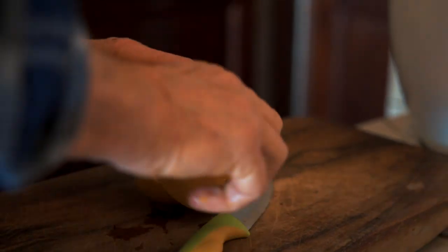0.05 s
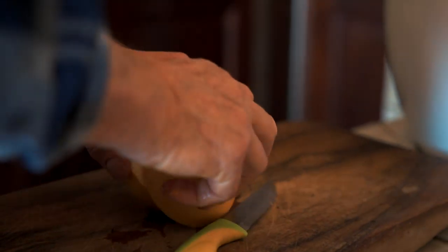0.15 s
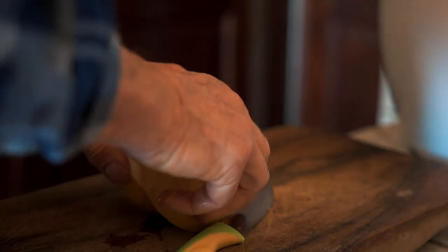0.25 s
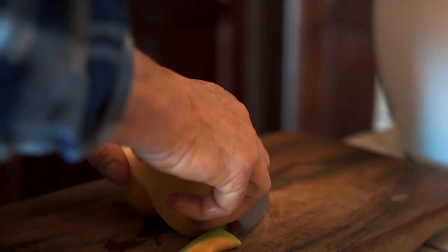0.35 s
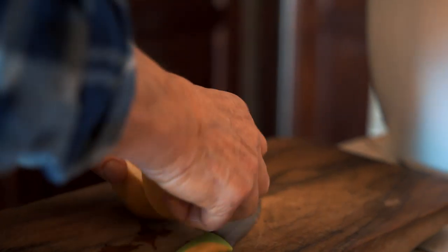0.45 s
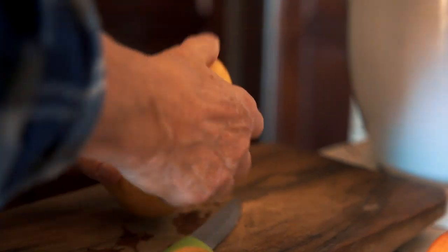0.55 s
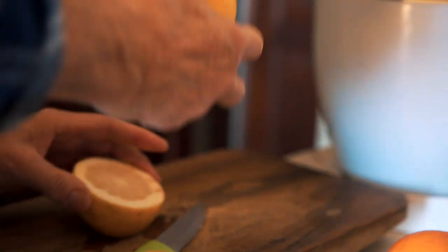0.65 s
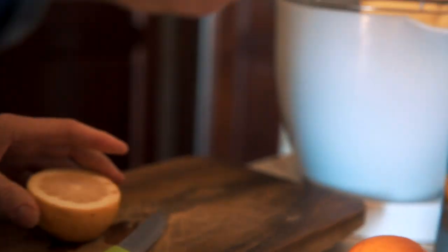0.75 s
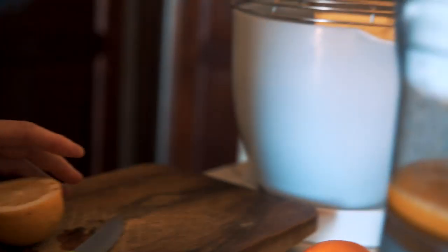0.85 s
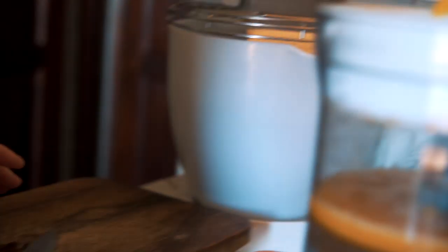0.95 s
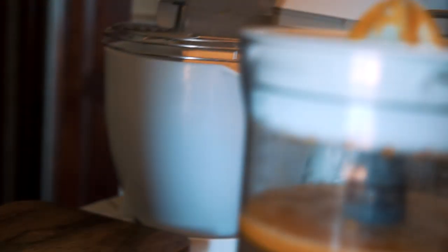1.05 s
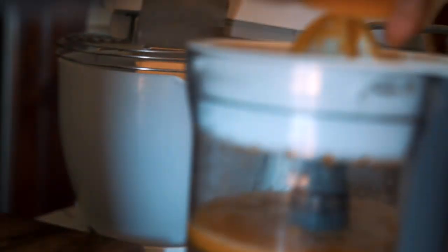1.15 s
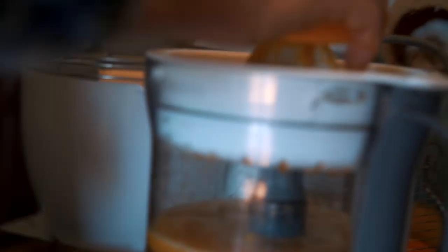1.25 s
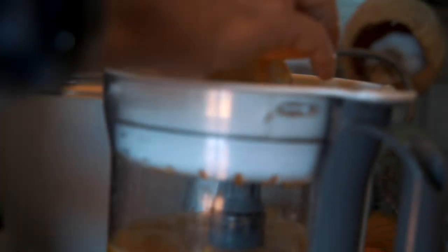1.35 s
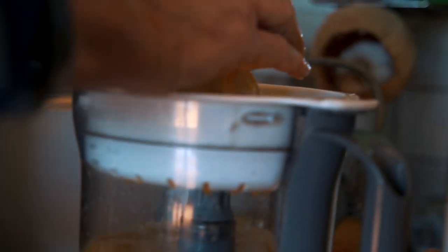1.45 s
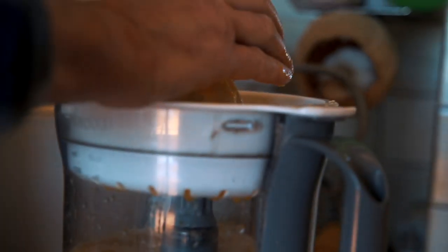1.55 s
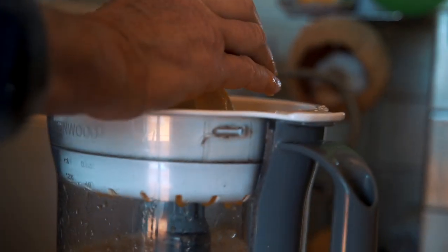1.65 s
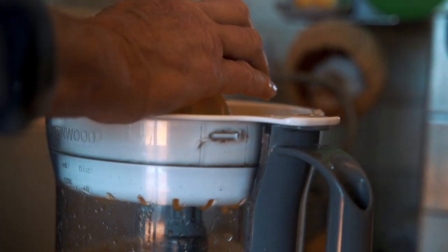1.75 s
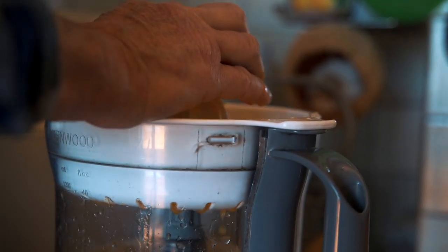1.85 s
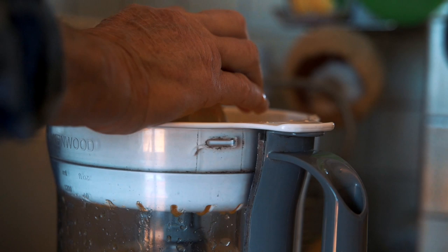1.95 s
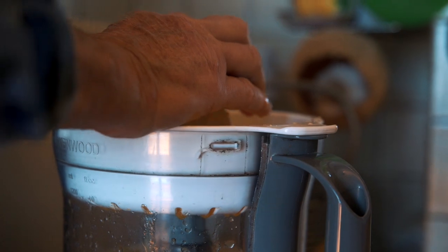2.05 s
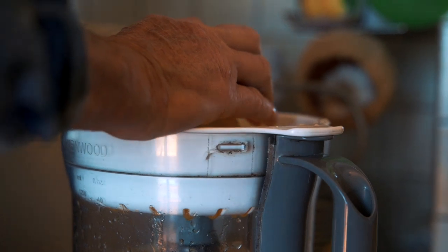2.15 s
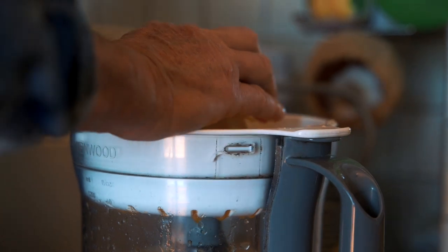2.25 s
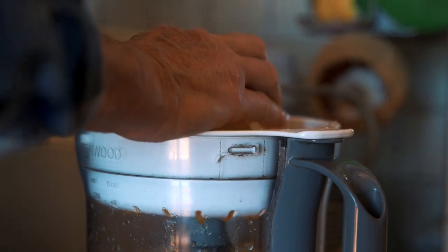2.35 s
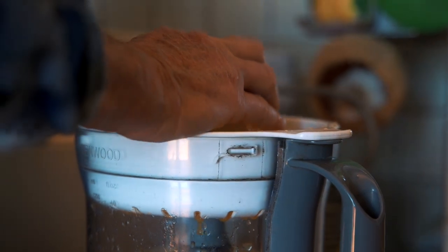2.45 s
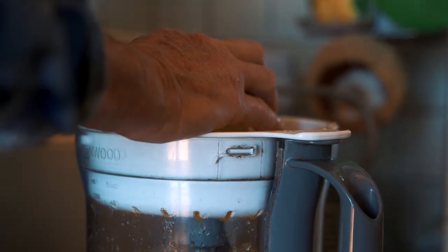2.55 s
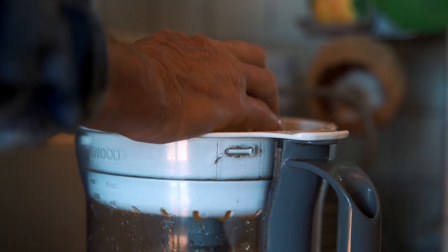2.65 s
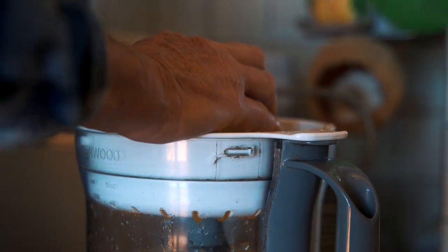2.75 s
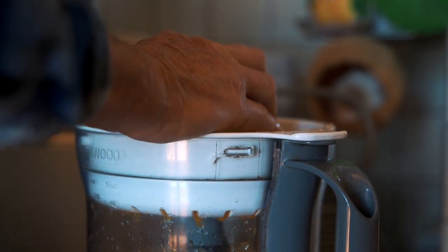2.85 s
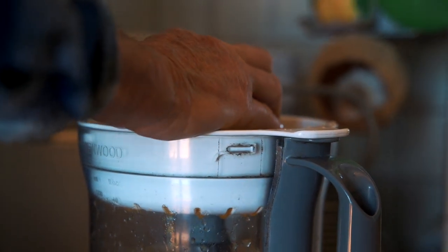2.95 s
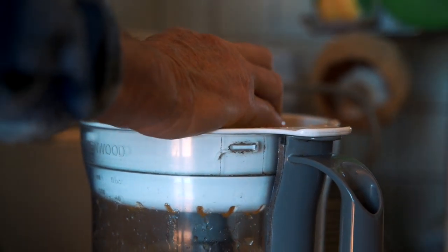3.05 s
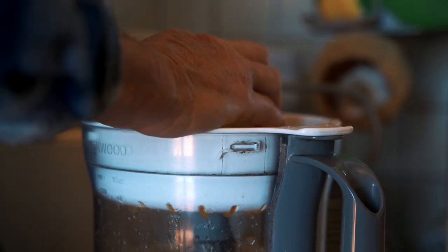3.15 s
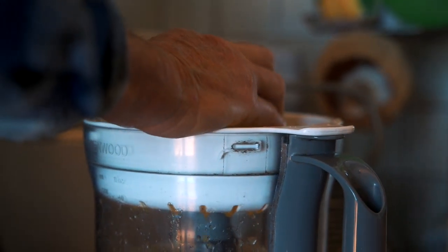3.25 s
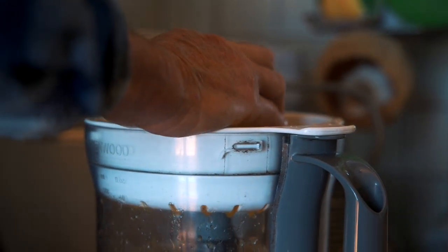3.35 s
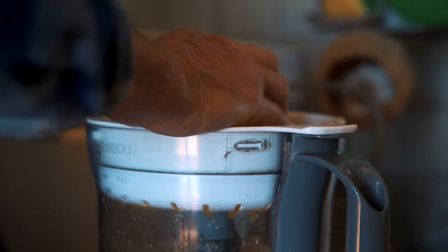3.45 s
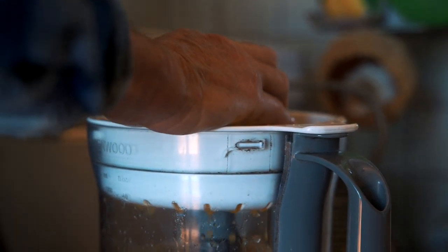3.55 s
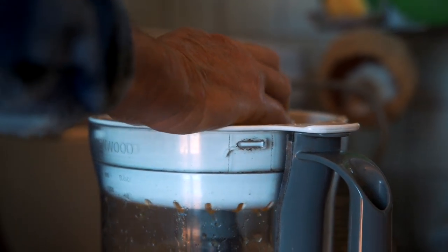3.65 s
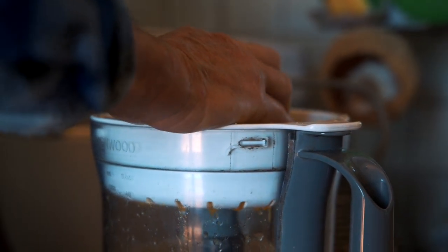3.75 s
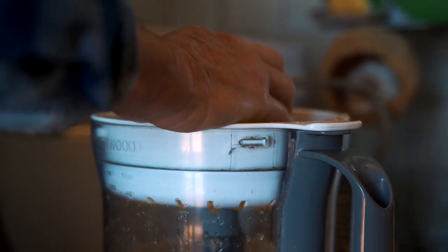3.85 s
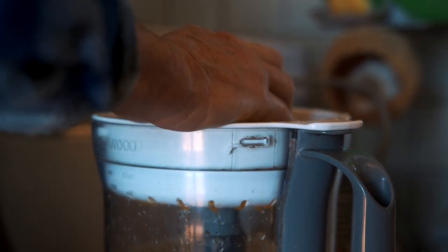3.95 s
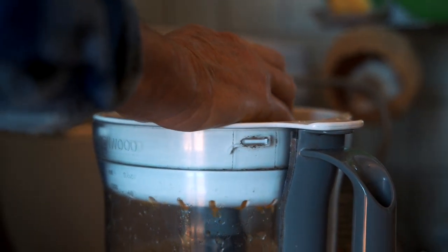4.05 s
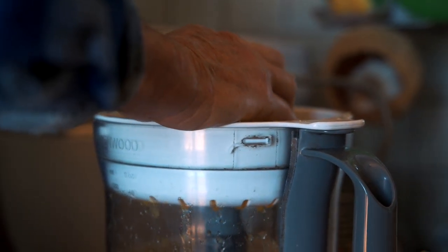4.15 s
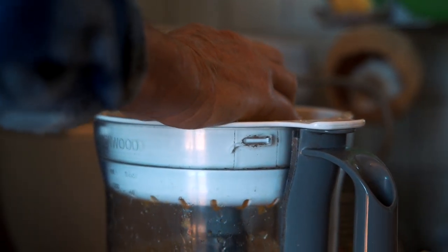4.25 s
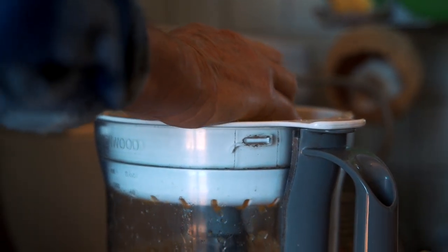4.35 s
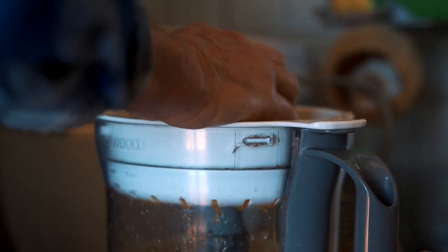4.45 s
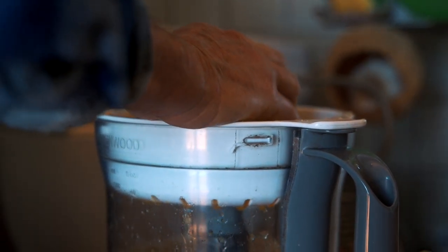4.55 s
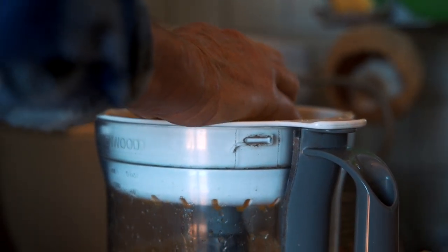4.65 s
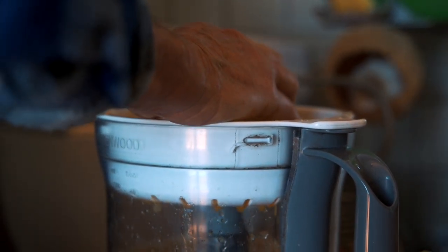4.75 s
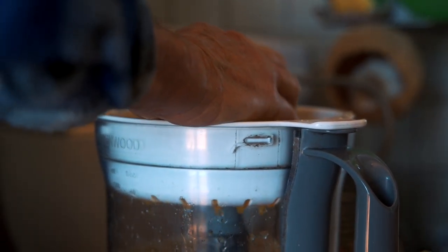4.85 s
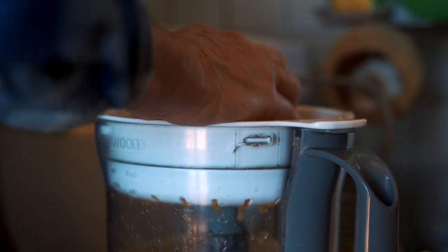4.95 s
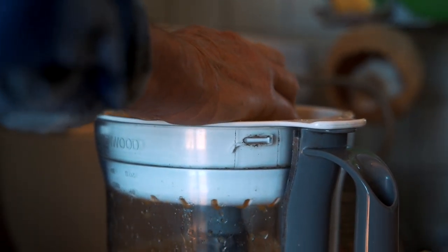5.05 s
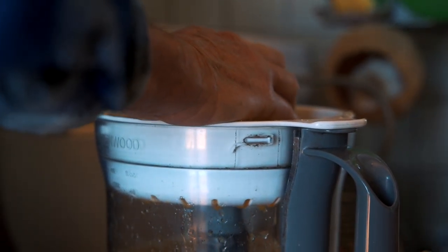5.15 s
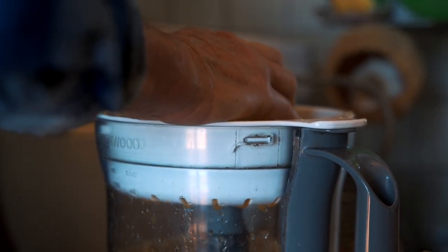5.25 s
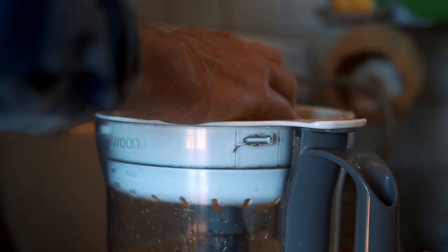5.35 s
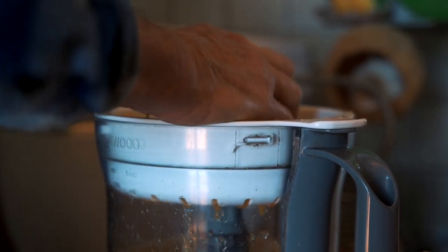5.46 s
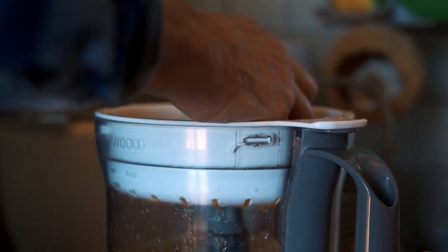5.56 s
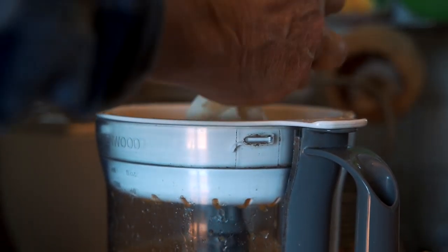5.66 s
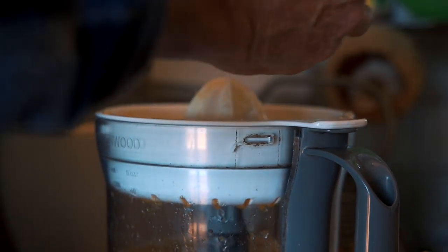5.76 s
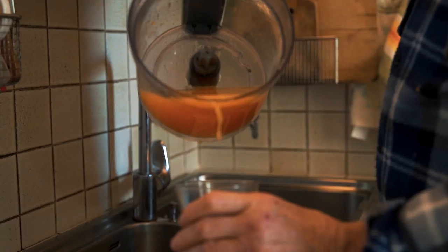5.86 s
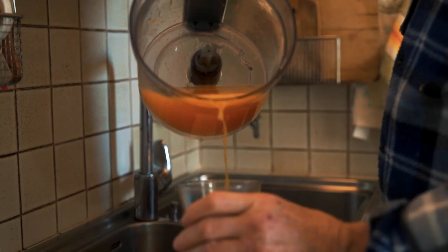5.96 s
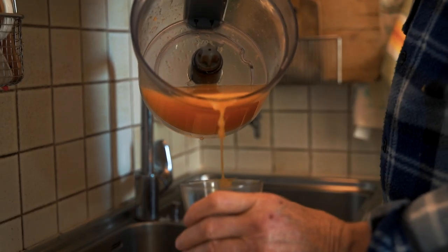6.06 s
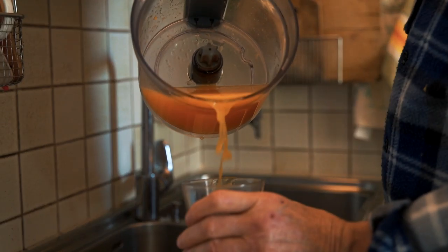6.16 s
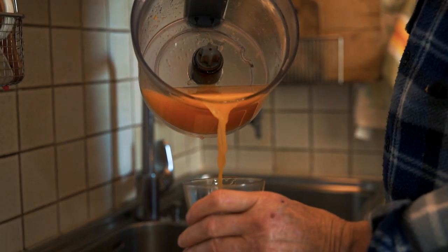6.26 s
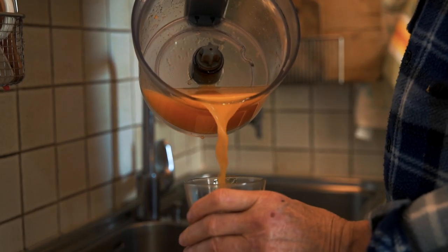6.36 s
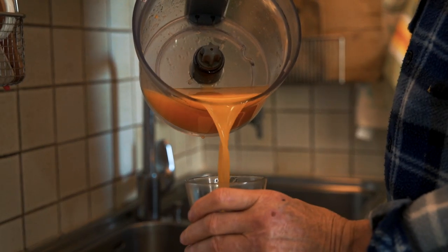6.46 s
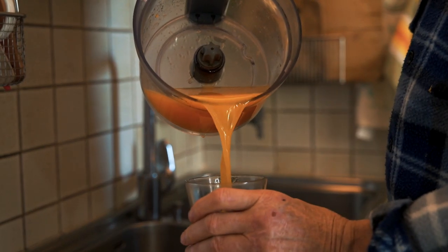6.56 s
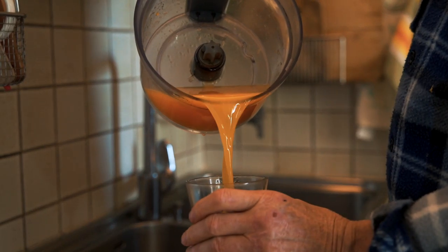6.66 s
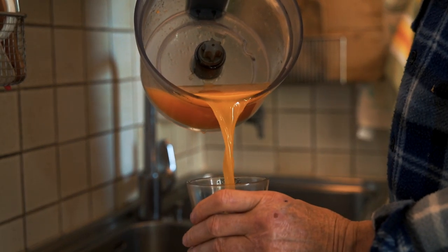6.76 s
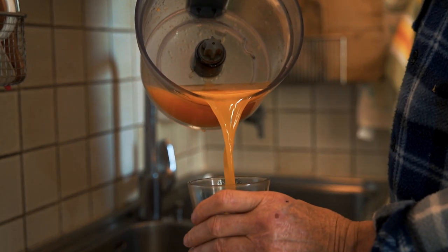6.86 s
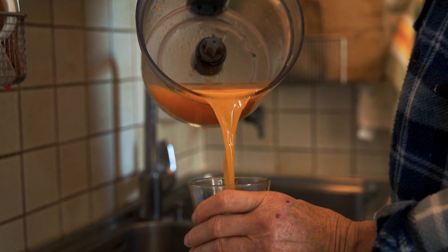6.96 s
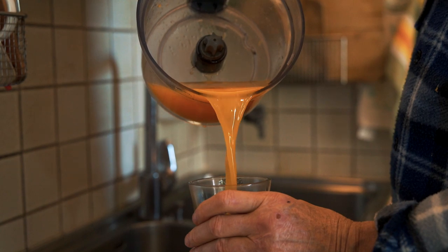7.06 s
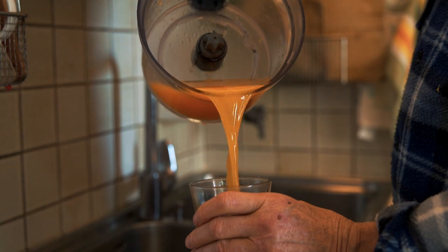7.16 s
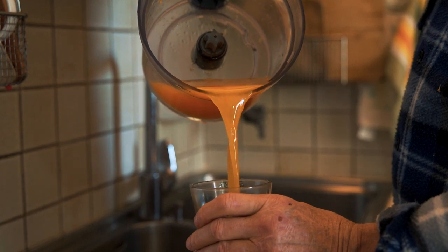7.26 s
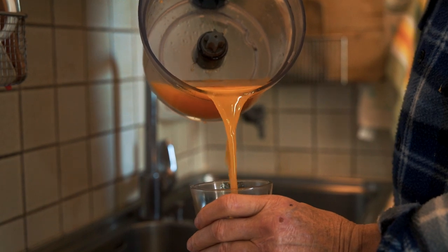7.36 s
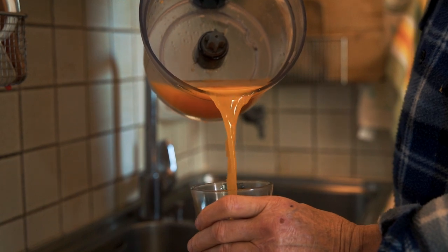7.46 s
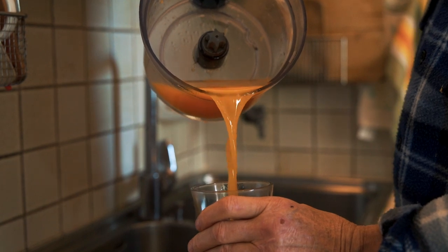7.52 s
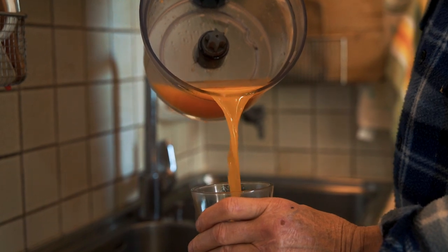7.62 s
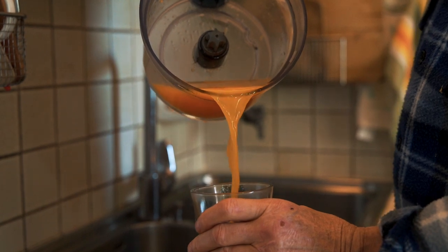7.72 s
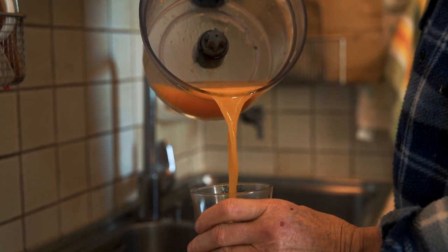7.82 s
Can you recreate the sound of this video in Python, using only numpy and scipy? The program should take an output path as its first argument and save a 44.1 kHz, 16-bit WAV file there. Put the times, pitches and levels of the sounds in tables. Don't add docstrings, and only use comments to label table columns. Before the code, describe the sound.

At 0.06 s a knife strikes a wooden board very loudly, rebounds and chatters, its blade ringing briefly until about 0.3 s. Sleeve and skin rustle, with low camera bumps around 0.7 to 1.3 s. Soft fruit and hollow plastic knocks come from 0.7 s, clustering at 1.7 to 2.1 s, the strongest near 1.9 s; a very faint high squeak sits near 1.5 s. At 2.07 s the juicer runs up quickly, catches with a jolt, then holds a rough, throbbing gear whine near 2.4 kHz, dipping slightly under pressing. Released at 5.33 s, it slides down in pitch and cuts off at 5.9 s. The much quieter pour follows: jug movement, a trickle from 6.3 s, then a fuller stream with low rising glugs, bubbles, a plop near 7 s, crisp drops, fizz and faint glass clinks, strongest toward 7.9 s. Close, nearly mono, short kitchen reflections.

```python
import sys
import numpy as np
from scipy import signal
from scipy.io import wavfile
from scipy.ndimage import uniform_filter1d

SR = 44100
rng = np.random.default_rng(int(sys.argv[2]) if len(sys.argv) > 2 else 0)


def gain_from_db(level_db):
    decades = np.asarray(level_db, float) / 20
    return 10 ** decades


def int16_out(signal):
    q = np.round(np.clip(np.atleast_2d(signal).T, -1, 1) * 32767)
    wavfile.write(sys.argv[1], SR, q.astype(np.int16))


N = 347949
T = np.arange(N) / SR
ON_S, OFF_S, CUT_S = 2.07, 5.328, 5.905


def evened(x):
    return x / np.sqrt(np.mean(x ** 2) + 1e-20)


def read(points, hz):
    point_hz, value = np.transpose(points)
    return np.interp(np.log(hz + 1), np.log(point_hz + 1), value)


def curve(rows, t, order=1, off=None):
    rows = np.array(rows)
    return np.interp(t, rows[:, 0], rows[:, order], off, off)


def humps(rows, order, rise=1., fall=0.89):
    t = T[::32]
    slopes = []
    for row in rows:
        distance = np.maximum((row[0] - t) / rise, (t - row[0]) / fall)
        slopes.append(row[order] - 10 * distance / row[-1])
    return np.interp(T, t, np.max(slopes, axis=0))


def drift(steps):
    slow = rng.standard_normal(N // 64 + 1)
    for _ in range(2):
        slow = uniform_filter1d(slow, round(steps))
    return np.interp(np.arange(N) / 64, np.arange(len(slow)), evened(slow))


def add(mix, s, sound):
    part = mix[max(round(s * SR), 0):][:len(sound)]
    part += sound[:len(part)]


def band(x, lo_hz, hi_hz):
    return signal.sosfilt(signal.butter(3, [lo_hz, min(hi_hz, 20000)], "band", fs=SR, output="sos"), x)


def levels(x, parts_db, *split_hz):
    lows = [signal.sosfiltfilt(signal.butter(3, hz, fs=SR, output="sos"), x) for hz in split_hz]
    parts = np.diff([0 * x, *lows, x], axis=0)
    return sum(evened(p) * gain_from_db(db) for p, db in zip(parts, parts_db))


def noise(shape_db, patchy_db):
    hz = np.fft.rfftfreq(1024, 1 / SR)
    real, imaginary, patches = rng.standard_normal((N // 256 + 5, 513, 3)).T
    patches = evened(uniform_filter1d(uniform_filter1d(patches, 10, 0), 10, 1))
    bins = (real + 1j * imaginary) * gain_from_db(shape_db(hz)[:, None] + patchy_db * patches)
    return evened(signal.istft(bins, nperseg=1024, noverlap=768)[1][:N])


def ring(modes, seconds):
    t = np.arange(round(seconds * SR)) / SR
    return sum(gain_from_db(db - 60 * t / t60) * np.sin(2 * np.pi * hz * t) for hz, db, t60 in modes)


def crack(t60, dark_db, lo_hz=900):
    t = np.arange(2600) / SR
    burst = rng.standard_normal(len(t)) * gain_from_db(-60 * t / t60)
    return 0.69 * (band(burst, lo_hz, 4800) * 2 + gain_from_db(dark_db) * band(burst, 5300, 13500))


# mode_hz [Hz], level_db [dB], t60_s [s]
BLADE_MODES = [(118, -8, .5), (104, -16, .4), (139, -9, .4), (200, -12, .3), (258, -11, .4), (440, -12, .5),
               (705, -6, 1.2), (716, -17, .6), (1130, -8, .2), (1367, -12, .2), (1545, -11, .5),
               (1800, -11, .3), (1645, -5, .45), (1666, -2.5, .85), (1679, -10, .5), (1938, -7, .3),
               (1990, 10, .03), (1990, -4, .55), (2034, -7, .5), (2052, -13, .3), (2934, -20, .2),
               (4100, -3, .015), (3600, -13, .012)]
# time_s [s], force_db [dB]
CHATTER_FORCE = [
    (.057, -30),
    (.07, -24),
    (.085, -16),
    (.1, -13),
    (.125, -5),
    (.155, -23),
    (.17, -38),
    (.235, -55),
    (.25, -31),
]
# start_s [s], peak_db [dB], share into the modes ring_db [dB], crack t60_s [s], brightness_db [dB]
KNIFE_BLOWS = [
    (.001, -40, -39, .01, 10),
    (.021, -29, -39, 0.018, 8),
    (.056, 9, -14.5, 0.011, -13),
    (.109, -14, -13.5, 0.01, -22),
    (.126, -8, -13, 0.0068, -14),
    (.129, -19, -24, .008, 10),
    (0.155, -19, -17.5, 0.0042, -15.5),
    (0.219, -30.5, -5, 0.0066, -1.5),
]


def knife():
    force = rng.standard_normal(N) * gain_from_db(curve(CHATTER_FORCE, T, off=-120) - 22.0)
    out = band(force, 650, 2500) * gain_from_db(15.5)
    force *= gain_from_db(-9.)
    earlier_tap = [(719, -21.5, 0.24), (1173, -36.5, 0.054), (1780, -29, 0.037), (1810, -37.5, .08)]
    add(out, 0, ring(earlier_tap, seconds=.1))
    for s, db, ring_db, t60, bright_db in KNIFE_BLOWS:
        force[round(s * SR)] += gain_from_db(db + ring_db)
        add(out, s, gain_from_db(db) * crack(t60, bright_db, lo_hz=1530))
    flat_db = 3 * np.clip((T - .152) / .01, 0, 1) + 4 * np.clip((T - .232) / .02, 0, 1)
    touching = gain_from_db(1 + 2.6 * drift(5.) - flat_db)
    return out + signal.oaconvolve(force, ring(BLADE_MODES, seconds=0.91))[:N] * 0.31 * touching


# start_s [s], rumble_db [dB], thud_db [dB]
CAMERA_GRIP = [
    (0, -47, -34),
    (.36, -32, -41.5),
    (1.4, -32, -47.5),
    (2.06, -52.5, -45.5),
    (5.55, -50, -61),
]
# time_s [s], rumble_db [dB], thud_db [dB]
CAMERA_BUMPS = [
    (0, -40, -70),
    (.13, -57, -21.5),
    (0.721, -21.5, -22),
    (1.05, -21, -28),
    (1.16, -21.5, -47),
    (1.27, -22, -33),
    (2.0, -23, -50),
    (3.76, -40, -60),
]


def handling():
    out = np.zeros(N)
    held = np.searchsorted([g[0] for g in CAMERA_GRIP], T, "right") - 1
    for column, lo_hz, hi_hz, pace_s in [(1, 17, 36, 0.052), (2, 66, 172, .075)]:
        steady_db = uniform_filter1d(np.array(CAMERA_GRIP, float)[held, column], size=4000)
        bump_db = humps([b + (pace_s,) for b in CAMERA_BUMPS], order=column, rise=.6)
        shaking = evened(band(rng.standard_normal(N), lo_hz, hi_hz))
        out += shaking * gain_from_db(np.maximum(steady_db, bump_db))
    return out


# freq_hz [Hz], density_db [dB per Hz]
CLOTH_COLOUR = [(120, -38), (200, -21.5), (268, -7), (305, -14), (456, 4.5), (519, -12), (709, -2),
                (4430, -10.5), (16000, -33)]
# time_s [s], level_db [dB], treble_db [dB], fade_s
# [s per 10 dB]
CLOTH_SWEEPS = [(0, -30.5, -68, 0.045), (.19, -29, -59, 0.086), (.58, -43, -48, 0.21), (1.18, -48, -51, .1),
                (1.26, -46, -50.5, .18), (1.7, -52, -62, .6), (2.0, -46.5, -60, .1), (.9, -49, -62, .12),
                (1.03, -46, -58, .1), (1.135, -50, -55, .03), (1.74, -50, -57, .1), (1.93, -42, -54, .08)]


def cloth():
    still_db, still_treble_db = -57.5, -71
    gone_db = -7 * (T > ON_S - .03) - 50 * np.maximum(T - 6.05, 0)
    low_db = np.maximum(humps(CLOTH_SWEEPS, order=1, rise=1.4), still_db) + gone_db
    treble_db = np.maximum(humps(CLOTH_SWEEPS, order=2, rise=0.55, fall=.5), still_treble_db) + gone_db
    return levels(noise(lambda hz: read(CLOTH_COLOUR, hz), patchy_db=0.5), [low_db, treble_db], 4000)


# start_s [s], peak_db [dB], # hollow
# note pitch_hz [Hz], note over crack note_db [dB], brightness_db [dB]
FRUIT_KNOCKS = [(0.704, -31, 705, 0, -31), (0.849, -28.5, 1096, -6.5, -29.5), (1.027, -28.5, 925, 0.5, -29),
                (1.27, -21, 272, 1, -41), (1.381, -30.5, 297, 9.5, -39.5), (1.469, -44, 280, 12, -21),
                (1.63, -45, 418, 3.5, -22), (1.711, -26, 315, 2, -19), (1.747, -31, 307, -8, -12.5),
                (1.776, -35, 296, -12, -16.5), (1.811, -21, 307, -5, -29), (1.383, -35, 564, 9, -40),
                (1.908, -12, 342, -13, -20.5), (1.98, -26.5, 276, -1, -16.5), (2.032, -31, 433, -15, -21),
                (2.074, -22, 1234, 5, -40), (6.271, -43, 385, 5, -18.5), (.54, -42, 900, 0, -35),
                (1.023, -36, 2300, 4, -25), (.85, -42, 1500, -10, -10), (1.285, -32, 420, 4, -30),
                (1.917, -18, 1850, -4, -38), (1.952, -34, 1200, -5, -30), (2.1, -36, 4250, -6, -8),
                (2.115, -34, 2700, -2, -8), (.862, -36, 1300, -5, -20), (1.849, -44, 300, -5, -12),
                (2.118, -28, 1200, 3, -20)]
# mode_hz [Hz], level_db [dB], t60_s [s]
SHELL_MODES = [(317, -5, 0.095), (554, -9, 0.17), (1084, -5.5, 0.005), (1966, 7, 0.03), (2500, -8, 0.01)]


def knocks():
    out = np.zeros(N)
    for s, db, hz, note_db, bright_db in FRUIT_KNOCKS:
        modes = [(f * rng.uniform(0.827, 1.12), d, t60) for f, d, t60 in SHELL_MODES]
        shell = ring(modes, seconds=.15) * gain_from_db(-13.0)
        note = ring([(hz, note_db + 1.5, .045)], seconds=.15)
        soft = np.minimum(np.arange(len(note)) / 71.0, 1)
        add(out, s, gain_from_db(db) * (shell + note) * soft)
        snap = crack(0.035, dark_db=.6 * bright_db + 5.0, lo_hz=1800)
        add(out, s, gain_from_db(db - 2.0 + .35 * bright_db) * snap)
        body = band(crack(0.076, dark_db=-30, lo_hz=250), 275, 2070)
        add(out, s + 0.0014, gain_from_db(db - 1.0) * body)
    return out


# time_s [s], pitch_hz [Hz], level_db [dB]
RIND_SQUEAK = [
    (1.41, 9570, -84),
    (1.482, 9551, -82),
    (1.588, 9688, -75),
    (1.63, 9560, -90.5),
]


def squeak():
    hz = curve(RIND_SQUEAK, T) + 120 * drift(3.)
    level_db = curve(RIND_SQUEAK, T, order=2, off=-120) + 8.0
    return gain_from_db(level_db) * np.sin(2 * np.pi * np.cumsum(hz) / SR)


# time_s [s], tooth_rate_hz [Hz]
LOADED_GEARS = [
    (2.7, 2500),
    (3.0, 2482),
    (3.4, 2433),
    (3.6, 2438),
    (4.1, 2472),
    (4.5, 2430),
    (4.85, 2418),
    (5.28, 2474),
]


def tooth_rate():
    short_hz, run_up_s = 1292.7, .08
    crawl_hz, coast_s = 555, .2
    up = np.maximum(T - ON_S, 0) / run_up_s
    driven = curve(LOADED_GEARS, T) - short_hz * (1 + up) * np.exp(-up)
    coasting = np.exp(-np.maximum(T - OFF_S, 0) / coast_s)
    return uniform_filter1d(crawl_hz + (driven - crawl_hz) * coasting, size=1800)


# level_db [dB at speed], lost_db [dB lost at rest], bend of that loss [power],
# gain_db [dB per s of juicing], share of a jolt jolt_db [dB]
MOTOR_LAYERS = [
    (-26, 32, 3.27, -.5, -1.5),
    (-31.5, 74.5, 3.47, -0.1, -9),
    (-49.5, 38, 1.4, .4, -33),
]
# time_s [s], level_db [dB], fade_s [s per 10 dB]
GEAR_JOLTS = [
    (2.118, -20.5, 0.23),
]


def motor_levels(speed):
    slip_s, slip_db, half_width_s = 2.155, 10, .025
    slow = np.clip(1 - speed, 0, 1)
    jolt_db = humps(GEAR_JOLTS, order=1, rise=.3)
    lost_grip_db = slip_db * np.maximum(1 - abs(T - slip_s) / half_width_s, 0)
    off_db = -90 * (np.clip((ON_S + .003 - T) / .02, 0, 1) + (T > CUT_S))
    out = []
    for db, lost, bend, gain, share in MOTOR_LAYERS:
        turning_db = db - lost * slow ** bend + gain * (T - ON_S) - lost_grip_db
        out.append(np.maximum(turning_db, jolt_db + share) + off_db)
    return out


# freq_hz [Hz], density_db [dB per Hz]
HOUSING_COLOUR = [(35, -47), (60, -21), (444, -6.5), (740, -9), (913, -2.5), (1520, -3), (2210, -11.5),
                  (2430, -13), (2600, -16), (3900, -23), (4550, -30), (4870, -28), (6150, -33.5),
                  (8720, -38), (15600, -58)]
# mode_hz [Hz], width_hz [Hz], level_db [dB]
PANEL_PEAKS = [(293.8, 60, 11.5), (455.7, 39, 15), (843.4, 31, 11), (1015, 73, 7.5), (1232, 69, 6.5),
               (1528, 68, 11), (1844, 72, 5.5), (2392, 37, 1.5), (4932, 95, 6), (7360, 120, 6),
               (8550, 1200, 11.5), (9750, 240, 6), (12600, 540, 12), (14520, 1800, 11)]


def housing_db(hz):
    peaks = sum(db / (1 + (2 * (hz - f) / w) ** 2) for f, w, db in PANEL_PEAKS)
    return read(HOUSING_COLOUR, hz) + peaks


# [dB at half speed, negative grows]
GEAR_WHINES = [(.0703, -54.5, 2.1, .1, 38), (0.0835, -52.5, 2.67, 0, 36), (0.3823, -37.5, 9, 0, 55),
               (.567, -39, 7.33, 0.1, 90), (.971, -52, 10, 0, 58), (0.9848, -44.5, 8.06, 0, 58),
               (1, -47, 14, 0.1, -2.5), (1.094, -54.5, 9.3, 0.3, 94), (2.001, -53, 34, 0.5, 100),
               (.62, -43, 9, .1, 60),
               (2, -63, 40, .3, -13), (3.04, -64, 50, .2, -3), (4, -73, 60, .3, -9)]


def motor():
    mesh, full_hz, teeth_per_turn = tooth_rate(), 2455, 69
    shaft = 2 * np.pi * np.cumsum(mesh / teeth_per_turn) / SR
    throb = 1 + 0.086 * np.cos(shaft / 2) + .12 * np.cos(shaft) + .1 * np.cos(2 * shaft)
    hum = noise(housing_db, patchy_db=0.85) * throb
    out = levels(hum, motor_levels(mesh / full_hz), 1696, 5000) * gain_from_db(-1.25)
    coast_db = np.clip(230 * (.475 - mesh / full_hz) * (T > OFF_S), 0, 45)
    off_db = 90 * (np.clip((ON_S + .02 - T) / .03, 0, 1) + (T > CUT_S))
    running_db = 4 - coast_db - off_db
    slowing = 2 * np.maximum(.99 - mesh / curve(LOADED_GEARS, T), 0)
    load_db = np.clip(.16 * (full_hz - mesh), -6, 5) * (slowing < .01)
    rattle = 1 + 3. * np.minimum(slowing, .4)
    for multiple, db, fuzz_hz, depth, lost_db in GEAR_WHINES:
        wander = drift(5.)
        swell = drift(95.)
        hz = multiple * mesh
        shell_db = 0.86 * (housing_db(hz[::64]) - housing_db(multiple * full_hz))
        level_db = db + np.repeat(shell_db, 64)[:N] + running_db + 0.58 * swell - lost_db * slowing
        level_db += 1.2 * slowing * (T < OFF_S) * (multiple == 1)
        level_db += 5 * np.minimum(slowing, .7) * wander
        level_db -= 60 * np.maximum(slowing - .5, 0) * (multiple > 1.5)
        level_db += load_db * (.95 < multiple < 1.05)
        phase = 2 * np.pi * np.cumsum(hz + fuzz_hz * rattle * wander) / SR
        out += gain_from_db(level_db) * np.sqrt(2) * np.sin(phase) * (1 + depth * np.cos(shaft + multiple))
    return out


# time_s [s], level_db [dB under full]
JUICE_FLOW = [
    (6.3, -19),
    (6.5, -10.5),
    (6.78, -2),
    (6.95, -6),
    (7.14, 0.5),
    (7.5, -1.5),
    (7.89, 1),
]
# level_db [dB at full stream], follow [dB per dB of stream]
STREAM_LAYERS = [
    (-53.5, 1.5),
    (-56, .55),
    (-56.5, 1.2),
    (-59, 1.6),
    (-61, 1.5),
    (-62.5, 1.3),
]


def stream_db(order):
    db, follow = STREAM_LAYERS[order]
    return db + follow * curve(JUICE_FLOW, T, off=-120)


# freq_hz [Hz], density_db [dB per Hz]
STREAM_COLOUR = [(88, -35), (150, -14), (209, -4), (683, -8), (1070, -5.5), (2320, -13), (5150, -16),
                 (6020, -14.5), (11000, -22), (15600, -31)]
# time_s [s], gurgle_db [dB], glass_db [dB], hiss_db [dB], fade_s [s per 10 dB]
STREAM_SURGES = [
    (5.98, -53, -53, -63, .22),
    (6.332, -51.5, -45.5, -70.5, 0.12),
    (6.955, -68, -49, -75, 0.9),
    (7.89, -60, -38.5, -60, .05),
]


def stream():
    flicker = gain_from_db((2.2 * drift(3.) + 2.5 * drift(18.)) * (T > 6.38))
    parts_db = []
    for k, fall in enumerate([1.3, .9, .65]):
        surge_db = humps(STREAM_SURGES, order=k + 1, rise=0.22, fall=fall)
        parts_db.append(np.maximum(stream_db(k), surge_db) - 90 * (T < CUT_S))
    flow = noise(lambda hz: read(STREAM_COLOUR, hz), patchy_db=-0.3) * flicker
    return levels(flow, parts_db, 550, 2300) * gain_from_db(-1.5)


def bubble(hz, t60, rise):
    t = np.arange(round(t60 * SR)) / SR
    swell = np.sin(np.pi / 2 * np.minimum(t * hz / 2.5, 1)) ** 2
    return gain_from_db(-60 * t / t60) * swell * np.sin(2 * np.pi * hz * (t + rise * t ** 2 / t60))


def fizz(start_s, lo_hz=2500, hi_hz=12000, turns=24.):
    out = np.zeros(N)
    tail = out[round(start_s * SR):]
    drops_per_s = 22.
    for hz in np.geomspace(lo_hz, hi_hz, 12):
        strength = gain_from_db(3.5 * np.minimum(rng.exponential(1, len(tail)), 3))
        drops = (rng.random(len(tail)) < drops_per_s / SR) * strength
        one_drop = bubble(hz, turns / hz, rise=.2) * (hz / 3000) ** -.3
        tail += signal.oaconvolve(drops, one_drop)[:len(tail)]
    return out / tail.std()


# start_s [s], peak_db [dB], pitch_hz [Hz]
DROP_SPLASHES = [(6.3245, -50, 2550), (6.4066, -39, 3900), (6.4765, -43, 3130), (6.5141, -40, 4120),
                 (6.553, -41.5, 5960), (6.6532, -40.5, 2518), (6.7516, -45, 3550), (6.8139, -28, 3040),
                 (6.8668, -36.5, 2700), (6.8921, -31, 4290), (6.985, -37, 2080), (7.0344, -38, 5400),
                 (7.0499, -39, 3920), (7.1078, -34.5, 6800), (7.1716, -34, 3400), (7.1906, -39, 3800),
                 (7.2757, -35, 4220), (7.3842, -30.5, 5570), (7.4171, -33.5, 3000), (7.792, -35, 3400),
                 (7.5173, -37.5, 2550), (7.5518, -39.5, 2270), (7.6251, -35.5, 3730), (7.6423, -30, 3090),
                 (7.6685, -35.5, 2870), (7.7024, -40.5, 3400), (7.7797, -29.5, 5130), (7.8675, -28, 3540),
                 (6.908, -38, 4800), (6.907, -41, 2500), (6.518, -45, 2600), (7.283, -38, 2700),
                 (7.203, -42, 3600), (7.418, -36, 6400), (7.876, -33, 3000), (7.857, -38, 2700),
                 (7.531, -40, 5600), (6.632, -46, 5400), (7.105, -40, 5000)]
# start_s [s], peak_db [dB], pitch_hz [Hz]
BURST_TICKS = [(6.3828, -56, 14700), (6.4112, -50, 5730), (6.4731, -55, 5950), (6.5005, -56, 6170),
               (6.508, -53, 5050), (6.5429, -49, 10300), (6.5529, -45, 5950), (6.5793, -53, 9350),
               (6.6057, -54, 6010), (6.6242, -53, 9310), (6.6511, -52, 5000), (6.7514, -47, 5110),
               (6.7729, -44, 10700), (6.7794, -45, 5340), (6.8133, -48, 5170), (6.8173, -45, 5680),
               (6.8682, -46, 6370), (6.8936, -39, 5220), (6.928, -62, 5590), (6.928, -45, 11100),
               (6.9644, -51, 5200), (7.0043, -45, 8680), (7.0438, -53, 7110), (7.0438, -42, 5190),
               (7.0901, -44, 6530), (7.1081, -40, 6930), (7.1859, -44, 5750), (7.2742, -48, 5140),
               (7.3022, -49, 7040), (7.369, -39, 6980), (7.3835, -38, 5220), (7.397, -38, 7010),
               (7.4159, -38, 6400), (7.4483, -46, 5110), (7.4823, -36, 8100), (7.5027, -43, 5800),
               (7.5257, -37, 5720), (7.5516, -36, 5430), (7.5596, -39, 8420), (7.5835, -42, 6300),
               (7.6209, -40, 6650), (7.6409, -33, 5590), (7.6698, -41, 6040), (7.7192, -40, 7040),
               (7.7791, -36, 5530), (7.832, -46, 7350), (7.8604, -42, 6790), (7.8744, -42, 5990),
               (7.8744, -40, 8620)]


def splashes():
    shared, side = np.zeros((2, N))
    for s, db, hz in DROP_SPLASHES:
        drop = gain_from_db(db - 7.) * crack(0.012, dark_db=-3.0, lo_hz=2500)
        add(drop, 0, gain_from_db(db) * bubble(hz, 42. / hz, rise=0.14))
        add(shared, s, drop)
        add(side, s, drop * rng.uniform(-0.71, .6) * (s > 6.38))
    for s, db, hz in BURST_TICKS:
        tick = gain_from_db(db - 2.) * band(crack(.014, dark_db=6., lo_hz=3500), .7 * hz, 1.5 * hz)
        add(shared, s, tick)
        add(side, s, tick * rng.uniform(-.4, .4))
    return shared, side


def glugs(rows):
    climb_hz_per_s = 2700
    out = np.zeros(N)
    for s, length, start_hz, db in rows:
        u = np.arange(round(length * SR)) / (length * SR)
        hz = start_hz + climb_hz_per_s * length * u ** 1.6
        envelope = gain_from_db(db - 1.5 - 4.5 * u) * np.sin(np.pi * u) ** 0.2
        add(out, s, envelope * np.sin(2 * np.pi * np.cumsum(hz) / SR))
    return out


# start_s [s], length_s [s], pitch_hz [Hz at start], level_db [dB]
NECK_GLUGS = [
    (6.5, .14, 171.4, -50.5),
    (6.652, .15, 169.2, -48.5),
    (7.09, .14, 165.6, -43.5),
    (7.326, .15, 149.3, -43.5),
    (7.329, 0.12, 257.3, -49),
    (7.55, .09, 188.4, -47.5),
    (7.664, .12, 178.8, -42.5),
]
# start_s [s], length_s [s], pitch_hz [Hz at start], level_db [dB]
SIDE_GLUGS = [(6.65, .17, 190, -62), (6.75, .1, 171, -61), (6.88, .12, 192, -62), (7.03, .15, 185, -53),
              (7.1, .1, 196, -60.5), (7.36, .12, 284, -55), (7.5, .15, 200, -58), (7.55, .135, 189, -57),
              (7.63, .13, 180, -61), (7.73, .14, 185, -55)]
# start_s [s], peak_db [dB], pitch_hz [Hz]
JUICE_BUBBLES = [(6.569, -37.5, 1390), (6.654, -36, 1170), (6.682, -37, 970), (6.715, -38, 950),
                 (6.754, -38, 1200), (6.822, -32.5, 1080), (6.856, -38, 1210), (6.89, -41, 1060),
                 (6.952, -25, 1074), (6.993, -36, 700), (6.62, -46, 1000), (6.735, -40, 950),
                 (6.775, -40, 1250), (6.818, -41, 1900), (7.045, -40, 1900), (7.52, -42, 1350),
                 (7.665, -40, 1350), (7.745, -36, 350), (7.83, -40, 330), (7.878, -36, 1150),
                 (7.041, -33.5, 1115), (7.076, -40, 1290), (7.171, -38, 1680), (7.267, -42.5, 1220),
                 (7.388, -44, 1120), (7.612, -39, 1510), (7.576, -38.5, 1400), (7.595, -38, 1780),
                 (7.649, -36.5, 1300), (7.723, -41, 910), (7.727, -33, 340), (7.768, -32.5, 330),
                 (7.792, -39, 1190), (7.811, -47, 1000)]
# mode_hz [Hz], level_db [dB], t60_s [s]
RIM_MODES = [(7000, 0, .25), (10300, -6, .2), (11400, -6, .2), (13300, -3, .4)]
# start_s [s], level_db [dB]
RIM_CLINKS = [
    (7.108, -64),
    (7.36, -68),
    (7.417, -64),
    (7.642, -63),
]
# time_s [s], level_db [dB]
FOLDED_AIR = [
    (6.62, -62),
    (6.68, -52),
    (6.9, -52),
    (6.97, -46),
    (7.08, -51),
    (7.15, -62),
    (7.55, -62),
    (7.89, -58),
]
# freq_hz [Hz], density_db [dB per Hz]
SPRAY_COLOUR = [(59, -46), (100, -15.5), (219, 0.5), (919, -18.5), (1460, -19), (1660, -17.5),
                (3480, -14.5), (10400, -22.5), (15600, -37.5)]


def pour():
    out = glugs(NECK_GLUGS)
    for s, db, hz in JUICE_BUBBLES:
        t60 = min(46. / hz, .085)
        add(out, s, gain_from_db(db + 2.5) * bubble(hz, t60, rise=0.2))
        add(out, s, gain_from_db(db - 15.) * crack(.012, dark_db=-25., lo_hz=900))
    plop = gain_from_db(-25) * bubble(1280, .045, rise=.48)
    add(out, 6.994, plop * np.minimum(np.arange(len(plop)) / 350., 1))
    for s, db in RIM_CLINKS:
        add(out, s, gain_from_db(db) * ring(RIM_MODES, seconds=.25))
    splash, splash_side = splashes()
    drops_level = gain_from_db(stream_db(order=3))
    burble = fizz(6.6, lo_hz=880, hi_hz=1260, turns=45.) * gain_from_db(curve(FOLDED_AIR, T, off=-120) - 2.5)
    mist = noise(lambda hz: read(SPRAY_COLOUR, hz), patchy_db=5.5)
    spray = levels(mist, [stream_db(order=4), stream_db(order=5)], 1500)
    shared = out + burble + splash + fizz(6.5) * drops_level
    side = splash_side + glugs(SIDE_GLUGS) + spray + fizz(6.4) * drops_level * gain_from_db(-15.0)
    return shared, side


# freq_hz [Hz], t60_s [s]
KITCHEN_DECAY = [(100, 0.93), (1000, 0.66), (4000, 0.36), (12000, 0.15)]


def kitchen(x):
    taps = np.zeros(SR // 2)
    at = np.arange(200, len(taps) - 20, 20)
    taps[at + rng.integers(0, 20, len(at))] = rng.choice([-1., 1.], len(at))
    hz, t, bins = signal.stft(taps, SR, nperseg=256)
    decay = gain_from_db(-60 * t / read(KITCHEN_DECAY, hz)[:, None])
    tail = signal.istft(bins * decay, SR, nperseg=256)[1]
    return signal.oaconvolve(x, tail / np.linalg.norm(tail))[:N]


def scene():
    blade, thuds = knife(), knocks()
    juice, side = pour()
    room = kitchen(gain_from_db(-14.0) * blade + gain_from_db(-16) * thuds + gain_from_db(-13.0) * juice)
    friction = cloth() + squeak()
    mono = blade + handling() + friction + thuds + motor() + stream() + juice + room
    return np.array([mono + side, mono - side])


def low_pass(x):
    return signal.sosfilt(signal.butter(12, 16350, fs=SR, output="sos"), x)


def record(dry):
    mix = np.clip(dry, -1, 1)
    return low_pass(mix)


dry = scene()
out = record(dry)
int16_out(out)
```